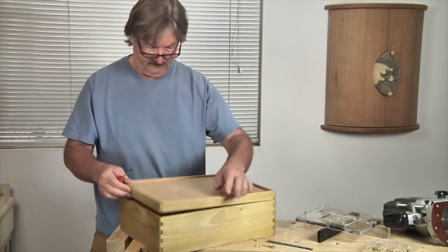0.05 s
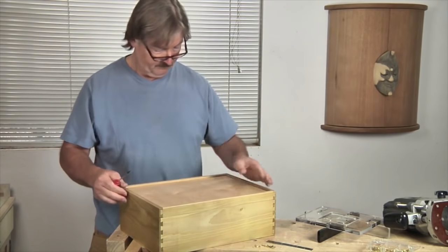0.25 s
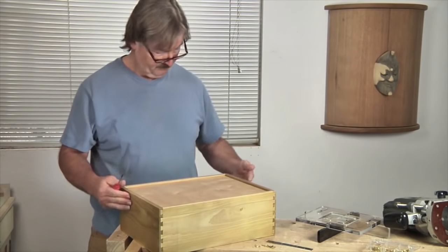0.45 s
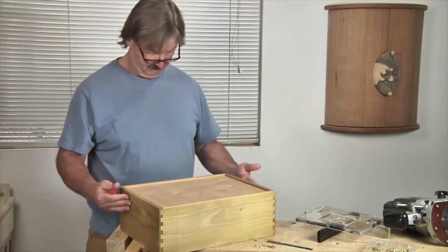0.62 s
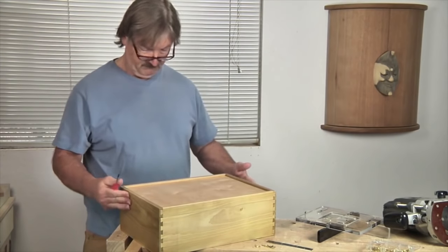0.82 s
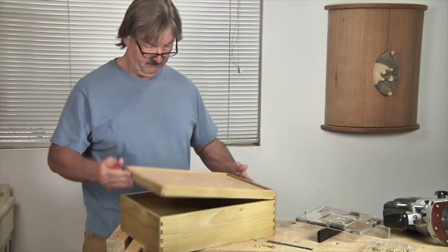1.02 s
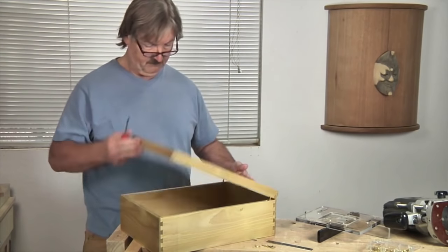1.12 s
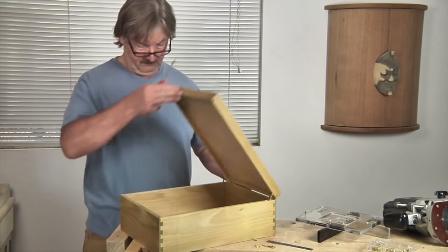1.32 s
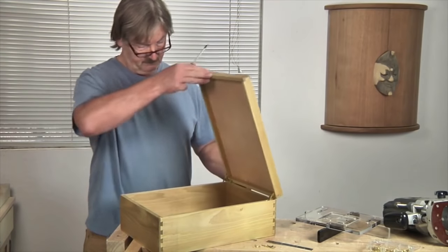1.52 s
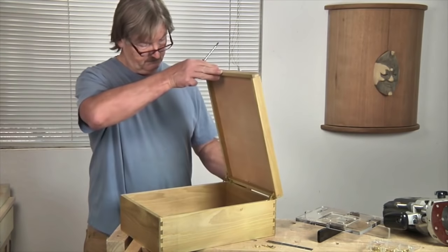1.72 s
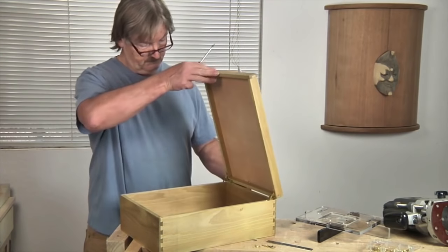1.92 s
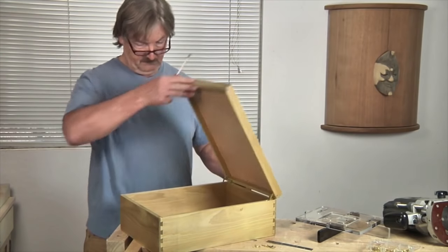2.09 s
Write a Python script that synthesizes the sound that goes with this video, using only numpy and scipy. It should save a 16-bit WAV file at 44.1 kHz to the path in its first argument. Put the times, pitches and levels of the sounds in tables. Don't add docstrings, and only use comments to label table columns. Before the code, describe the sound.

After a brief gritty slide, a lid claps onto a hollow box and bounces. Faint fingertip rubbing follows, then bright crackling hinge clicks as it opens, heard closely over low room hush.

```python
import sys
import numpy as np
from scipy import signal
from scipy.io import wavfile

SR = 44100
rng = np.random.default_rng(int(sys.argv[2]) if len(sys.argv) > 2 else 0)


def magnitude_from_level(level_db):
    exponent = np.asarray(level_db, float) / 20
    return 10 ** exponent


def int16_out(signal):
    q = np.round(np.clip(np.atleast_2d(signal).T, -1, 1) * 32767)
    wavfile.write(sys.argv[1], SR, q.astype(np.int16))


N = 94815

# frequency in Hz, level in dB per Hz.
HUSH_COLOUR = [(15, -4), (40, 3.5), (65, -12.5), (130, -14), (600, -22), (1500, -26), (5000, -29),
               (16000, -31.5)]
HUSH_SIDE_COLOUR = [(15, -9), (40, -5), (100, -16.5), (250, -22), (700, -24.5), (1500, -35.5),
                    (5000, -35.5), (16000, -37.5)]
# frequency in Hz, t60 in seconds.
ROOM_DECAY = [(60, 0.24), (150, .28), (400, 0.18), (1500, 0.22), (4000, 0.22), (8000, 0.19), (14000, 0.13)]
# frequency in Hz, level in dB per Hz.
SIDE_COLOUR = [(60, -2.5), (300, -10.5), (1100, -2), (2300, -3), (4000, -27), (16000, -16)]

# start in seconds, length in seconds, rise as a share, hiss in dB, wood in dB.
STROKES = [(-.05, 0.091, 0.23, -43, -44), (0.034, .14, .4, -51.5, -59), (0.359, 0.22, 0.45, -76.5, -62),
           (0.661, 0.11, 0.285, -61, -62.5), (0.74, 0.15, 0.33, -71.5, -70), (0.895, .19, 0.7, -63.5, -62),
           (1.127, 0.17, 0.31, -65.5, -75), (1.221, 0.26, 0.15, -57, -69),
           (1.294, 0.082, 0.13, -44.5, -53.5), (1.361, 0.13, .5, -58, -63), (1.467, .115, 0.27, -57, -58),
           (1.562, 0.14, 0.65, -67.5, -69.5), (1.67, .15, 0.37, -64, -69), (2.03, 0.13, .5, -63.5, -67.5)]
# start in seconds, length in seconds, rise as a share, hiss in dB, wood in dB.
FINGERS = [
    (.0, 0.13, 0.38, -56, -58),
    (0.146, 0.087, 0.45, -50.5, -56),
    (0.55, .1, 0.25, -58, -60),
    (1.04, 0.1, 0.6, -52, -58.5),
]
# frequency in Hz, level in dB per Hz.
SLIDE_COLOUR = [(300, -26), (800, -6.5), (1500, -7), (3000, -10), (7000, -11.5), (10000, -17),
                (16000, -30.5)]
SKIN_COLOUR = [(300, -23.5), (800, -9.5), (1500, -8.5), (3000, -10), (9000, -11), (13000, -18),
               (16000, -21.5)]
WOOD_COLOUR = [(40, -21), (120, -3), (300, 1.5), (600, 1), (1000, -7), (2000, -14.5), (4000, -42)]
# frequency in Hz, width in Hz, level in dB.
LID_MODES = [(281, 6.8, 4), (445, 33, -7), (560, 27, -14), (912, 14, -12)]
# start in seconds, length in seconds, rise as a share, level in dB.
HUMS = [
    (-.03, .11, 0.18, -33.5),
    (.08, 0.1, 0.39, -47),
    (1.08, 0.11, 0.31, -56),
    (1.21, .2, 0.6, -52.5),
]
# start in seconds, length in seconds, rise as a share, level in dB.
SQUEAK = (1.1, 0.2, -2, -72)
# start in seconds, length in seconds, rise as a share, level in dB, pitch in Hz.
PANEL_TONES = [(1.464, .125, .4, -62, 550), (1.69, .07, 0.38, -75, 546), (1.62, .25, .6, -75, 1214),
               (1.79, .36, .4, -70, 719), (2.03, .15, .5, -69.5, 544), (.55, .1, .5, -68, 560),
               (1.2, .09, 0.54, -66, 420), (1.295, .06, 0.36, -50, 742), (1.679, 0.17, 0.41, -79, 2439),
               (-.02, .1, .4, -51, 915), (.09, .11, .4, -60, 915), (-.02, .07, .5, -48, 445),
               (-.02, .05, .5, -48, 100), (.41, .07, .4, -62, 160), (.52, .14, .5, -64, 140),
               (.325, .045, .4, -46, 385), (.96, .1, .5, -66, 140), (1.47, .12, .5, -66, 280),
               (1.295, .06, .4, -52, 1330)]

# frequency in Hz, level in dB, t60 in seconds.
RIM_MODES = [(556, 6, 0.27), (935, -12, 0.44), (1415, -5.5, 0.19), (2400, -4.5, 0.13), (1150, -14, 0.29)]
BENCH_MODES = [(49.4, 4, 0.49), (84, 2.5, 0.32), (146, 4.5, 0.13), (204, 5.5, 0.09)]

# start in seconds, peak in dB, ring in Hz, broad burst in dB.
SNAPS = [(1.2357, -45, 3900, -1.5), (1.2912, -10, 6660, -19), (1.2935, -12, 5010, -12.5),
         (1.2945, -14, 7300, -13), (1.3026, -12, 7790, -7), (1.3063, -18.5, 5110, -5),
         (1.309, -20.5, 7800, -7), (1.3138, -18, 4650, -6), (1.3192, -16, 6410, -3),
         (1.3214, -13.5, 5000, -6.5), (1.3256, -19.5, 7860, -1), (1.3326, -28, 4140, -8.5),
         (1.3478, -16, 5400, -10), (1.35, -22, 6800, -8), (1.3926, -38, 4500, -4.5),
         (1.4145, -34, 7200, -14), (1.4165, -31.5, 3900, -2), (1.4629, -18, 5150, -10.5),
         (1.4662, -20, 4300, -10), (1.4661, -26, 4070, 0), (1.4806, -28, 6500, -8),
         (1.4876, -34.5, 3750, -3), (1.4956, -32, 3300, -21)]
TICKS = [(.2425, -13.5, 5140, -10), (.2675, -20, 4600, -9.5), (.3915, -55.5, 9000, 0.5),
         (.562, -50, 5400, -10), (.565, -52, 9500, -10), (.582, -54, 3900, -10),
         (1.2912, -21.5, 13200, -16), (1.3018, -20, 13400, -9), (1.3022, -24.5, 10500, -10),
         (1.313, -26.5, 10900, -8.5), (1.32, -19.5, 11400, -15), (1.3245, -25, 11400, -14.5),
         (1.3405, -28.5, 4200, -5), (1.4635, -32.5, 9400, -8.5), (1.4715, -31, 3930, -5),
         (1.4755, -33, 2600, -4), (1.4805, -34, 7900, -6), (1.491, -32, 3900, -2.5),
         (1.5145, -36, 1100, -18)]
# frequency in Hz, level in dB per Hz.
SNAP_COLOUR = [(200, -33), (700, -4), (1500, -4.5), (4000, 2), (8000, -9.5), (11000, -4.5), (14000, -11.5),
               (16500, -21.5)]
DULL_SNAP_COLOUR = [(200, -29.5), (700, -7.5), (1500, 2), (4000, -1), (8000, -13), (11000, -16.5),
                    (16500, -44.5)]

# start in seconds, push in dB, crack in dB.
BLOWS = [
    (0.2377, -2.5, -9),
    (.239, -12.5, -1),
    (0.249, -3.5, -13),
    (.255, -3, -9),
]
# start in seconds, level in dB.
BOUNCES = [(0.2454, -11.5), (.2622, -11), (0.2732, -15), (0.2784, -12.5), (0.2869, -16.5), (0.3046, -14.5)]
# frequency in Hz, level in dB, t60 in seconds.
BOX_MODES = [(259, -17, 0.13), (332, -2, .16), (401.6, -1, 0.27), (417.5, -9.5, .12), (458, -9, 0.2),
             (553, -12, 0.11), (665, -4, 0.06), (812, -8, 0.12), (904, -10, 0.07), (1063, -9, 0.048),
             (1312, -9.5, .08), (1745, -11.5, 0.065), (2250, -16.5, 0.093), (2830, -14.5, .06)]
# frequencies in Hz, levels in dB, t60s in seconds.
AIR_HZ = [42, 152.8, 207]
AIR_DB = [-29.5, -19.5, -17.5]
AIR_T60 = [.36, 0.27, 0.19]
# frequency in Hz, level in dB per Hz.
CRACK_COLOUR = [(100, -33), (300, -6), (800, -0.5), (2000, -2.5), (3300, -9.5), (5200, -9.5), (9000, -25),
                (16000, -41)]


def evened(x):
    return x / np.sqrt(np.mean(x ** 2) + 1e-20)


def read(points, hz):
    f, value = np.transpose(points)
    return np.interp(np.log(hz + 1), np.log(f + 1), value)


def coloured(x, points):
    hz = np.abs(np.fft.fftfreq(4096, 1 / SR))
    log_gain = np.maximum(read(points, hz), -100) * np.log(10) / 20
    phase = -signal.hilbert(log_gain).imag
    taps = np.fft.ifft(np.exp(log_gain + 1j * phase)).real
    return signal.oaconvolve(x, taps / np.linalg.norm(taps))[:len(x)]


def high_pass(x, hz):
    return signal.lfilter(*signal.butter(2, hz, "high", fs=SR), x)


def add(mix, s, sound):
    at = round(s * SR)
    sound = sound[max(-at, 0):]
    part = mix[max(at, 0):][:len(sound)]
    part += sound[:len(part)]


def resonate(x, hz, width_hz):
    r = np.exp(-np.pi * width_hz / SR)
    pole = r * np.exp(2j * np.pi * hz / SR)
    return 2 * signal.lfilter([1 - r], [1, -pole], x).real


def rings(modes):
    t = np.arange(SR // 2) / SR
    return sum(magnitude_from_level(db - 60 * t / t60) * np.sin(2 * np.pi * hz * t) for hz, db, t60 in modes)


def swells(rows):
    out = np.zeros(N)
    for s, length, rise, db in rows:
        u = np.arange(0, length, 1 / SR) / length
        ramp = np.interp(u, [0, np.clip(rise, .05, .95), 1], [0, 1, 0])
        add(out, s, magnitude_from_level(db) * np.sin(np.pi / 2 * ramp) ** 0.99)
    return out


def soft_start(t, rise_s):
    return np.sin(np.pi / 2 * np.minimum(t / rise_s, 1)) ** 2


def room(x):
    hz, t, z = signal.stft(rng.standard_normal(SR // 2), SR, nperseg=256)
    decay = magnitude_from_level(-60 * t / read(ROOM_DECAY, hz)[:, None])
    tail = signal.istft(z * decay, SR, nperseg=256)[1]
    start_s = 0.0027
    tail = tail * np.minimum(np.arange(len(tail)) / SR / start_s, 1)
    return signal.fftconvolve(x, tail / np.linalg.norm(tail))[:N]


def hush():
    a, b = rng.standard_normal((2, N))
    hush_db, side_db = -61.5, -9.5
    centre = magnitude_from_level(hush_db) * coloured(a, HUSH_COLOUR)
    return centre, magnitude_from_level(hush_db + side_db) * coloured(b, HUSH_SIDE_COLOUR)


def panel_tones(noise):
    t, out = np.arange(N) / SR, np.zeros(N)
    for *swell, hz in PANEL_TONES:
        sine = np.sqrt(2) * np.sin(2 * np.pi * hz * t)
        blur = 0.5 * evened(resonate(noise, hz, width_hz=30))
        out += swells([swell]) * (sine + blur)
    return out


def rubbing():
    grit_per_s, grit_db = 2500, 4
    grains = (rng.random(N) < grit_per_s / SR) * rng.standard_normal(N)
    grit = magnitude_from_level(grit_db * np.minimum(rng.exponential(1, N), 3)) * grains
    a, b, c = rng.standard_normal((3, N))
    drag = evened(0.3 * evened(grit) + b)
    dry = swells(row[:4] for row in STROKES) * coloured(drag, SLIDE_COLOUR)
    dry += swells(row[:4] for row in FINGERS) * coloured(drag, SKIN_COLOUR)
    dry += swells(row[:3] + row[4:] for row in STROKES + FINGERS) * coloured(c, WOOD_COLOUR)
    hum = sum(magnitude_from_level(db) / np.sqrt(width) * resonate(a, hz, width) for hz, width, db in LID_MODES)
    dry += swells(HUMS) * evened(hum)
    dry += swells([SQUEAK]) * evened(resonate(c, hz=5400, width_hz=130))
    dry += panel_tones(b)
    return dry + magnitude_from_level(-8) * room(dry)


def lift():
    out, t = np.zeros(N), np.arange(SR // 2) / SR
    lift_s, lift_db, damp_s = 1.055, -41, 0.089
    damped = 1 / (1 + np.exp((t - damp_s) / 0.01))
    add(out, lift_s, magnitude_from_level(lift_db) * rings(RIM_MODES) * soft_start(t, rise_s=0.023) * damped)
    thump_s, thump_db = 1.246, -51
    add(out, thump_s, magnitude_from_level(thump_db) * rings(BENCH_MODES) * soft_start(t, rise_s=0.016))
    return out


def hinges(rows):
    out, t = np.zeros(N), np.arange(SR // 40) / SR
    decay_s, rise_s, width_hz = 0.0017, 0.0007, 1400
    snap_db, ring_db, room_db = -3, -4, -4
    for s, db, hz, broad_db in rows:
        burst = rng.standard_normal(len(t)) * np.exp(-t / decay_s) * np.minimum(t / rise_s, 1)
        ring = resonate(resonate(burst, hz, width_hz), hz, width_hz)
        colour = SNAP_COLOUR if 1.28 < s < 1.34 else DULL_SNAP_COLOUR
        slip = magnitude_from_level(broad_db) * coloured(burst, colour) + magnitude_from_level(ring_db) * 4 * ring
        add(out, s, magnitude_from_level(db + snap_db) * slip)
    return out + magnitude_from_level(room_db) * room(out)


def knock():
    out, t = np.zeros(N), np.arange(SR // 20) / SR
    push_hz, push_db = 474, -1.5
    crack_s, crack_db = 0.0038, -5.5
    box_db, room_db = -13, -5
    puff_s, puff_db = 0.0027, -30.5
    u = 2 * np.pi * push_hz * t
    push = high_pass(np.sin(u) * np.exp(-u / 4), 140)
    for s, blow_push_db, blow_crack_db in BLOWS:
        crack = coloured(rng.standard_normal(len(t)) * np.exp(-t / crack_s), CRACK_COLOUR)
        add(out, s, magnitude_from_level(blow_push_db + push_db) * push + magnitude_from_level(blow_crack_db + crack_db) * crack)
    for s, db in BOUNCES:
        add(out, s, magnitude_from_level(db) * push)
    box = magnitude_from_level(box_db) * rings(BOX_MODES)
    landing_s = BLOWS[0][0]
    bounce_s, bounce_db, _ = BLOWS[2]
    add(out, landing_s, box)
    add(out, bounce_s, magnitude_from_level(bounce_db) * box)
    out = high_pass(out + magnitude_from_level(room_db) * room(out), 80)
    add(out, landing_s, rings(zip(AIR_HZ, AIR_DB, AIR_T60)))
    puff = magnitude_from_level(puff_db) * np.exp(-t / puff_s)[::-1]
    add(out, landing_s - len(t) / SR, puff)
    return out


def scene():
    hush_mid, hush_side = hush()
    mid = rubbing() + lift() + hinges(SNAPS) + hinges(TICKS) + knock()
    side = magnitude_from_level(-35) * coloured(room(mid), SIDE_COLOUR) + hush_side
    mid = mid + hush_mid
    return np.array([mid + side, mid - side])


def band_limit(x):
    return signal.sosfilt(signal.butter(12, 15850, fs=SR, output="sos"), x)


def record(dry):
    mix = np.clip(dry, -.97, .97)
    return band_limit(mix)


dry = scene()
out = record(dry)
int16_out(out)
```